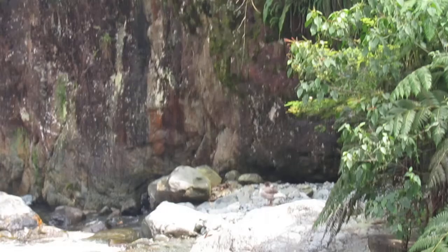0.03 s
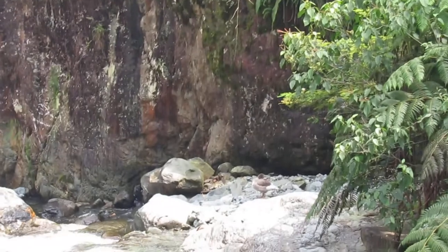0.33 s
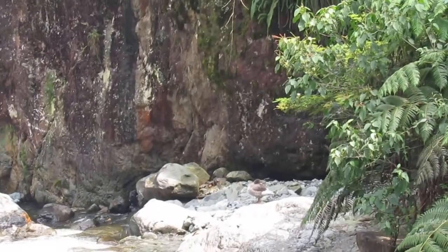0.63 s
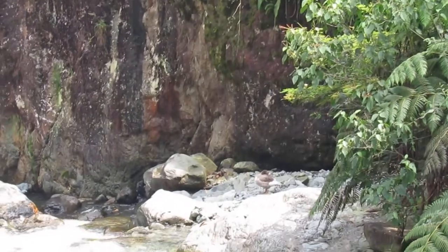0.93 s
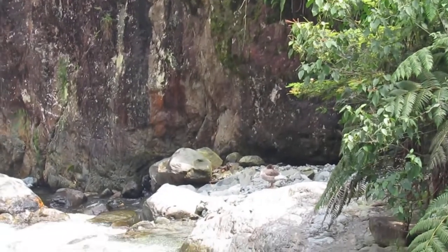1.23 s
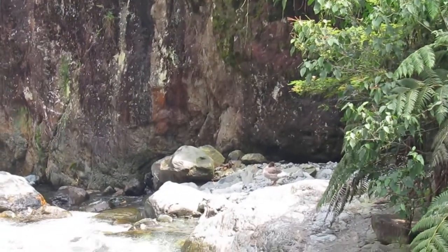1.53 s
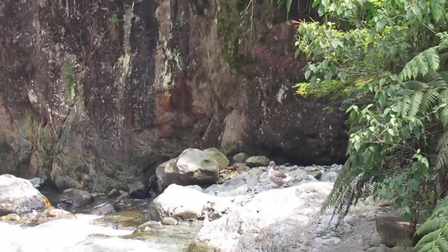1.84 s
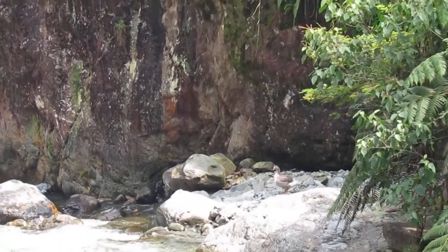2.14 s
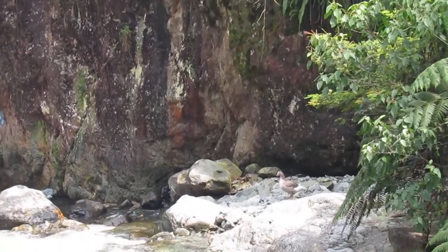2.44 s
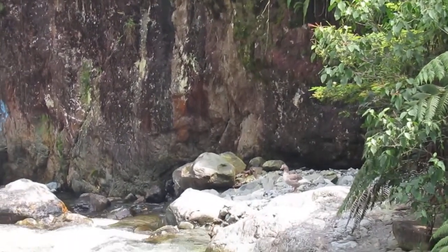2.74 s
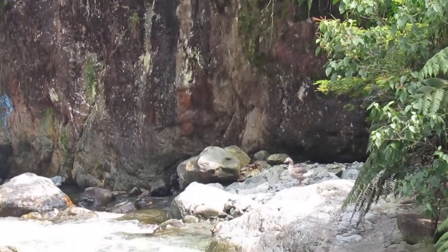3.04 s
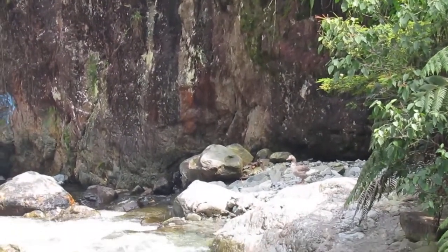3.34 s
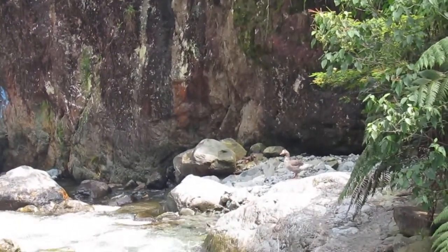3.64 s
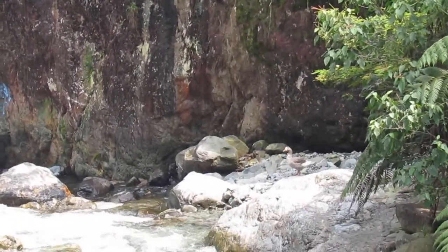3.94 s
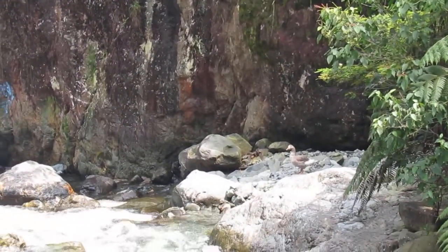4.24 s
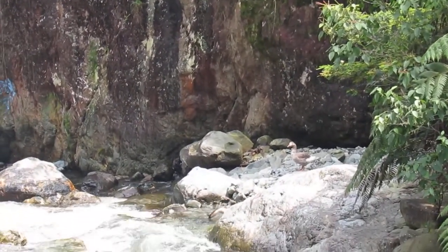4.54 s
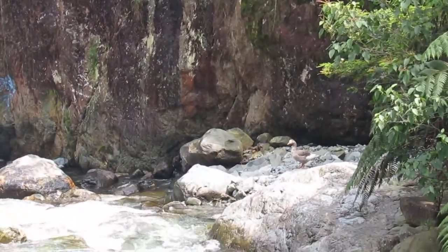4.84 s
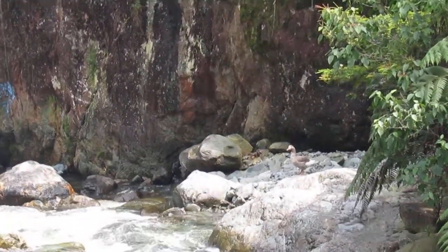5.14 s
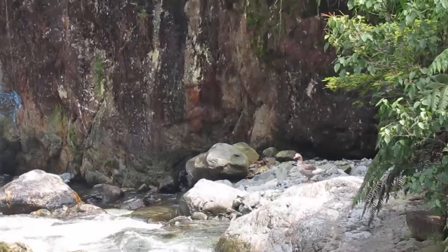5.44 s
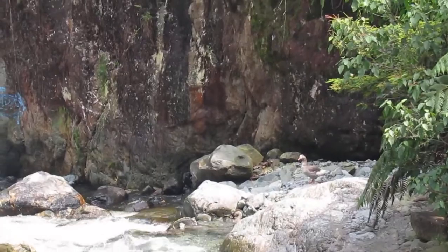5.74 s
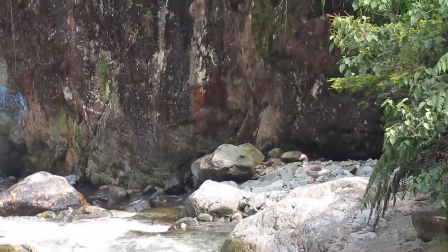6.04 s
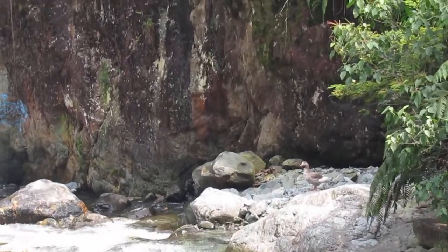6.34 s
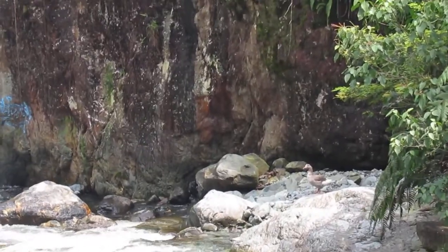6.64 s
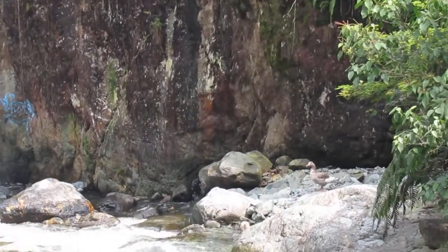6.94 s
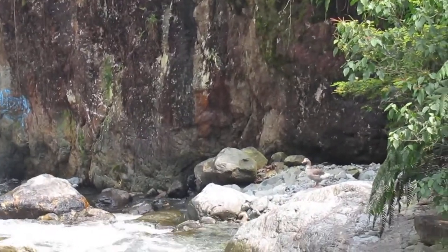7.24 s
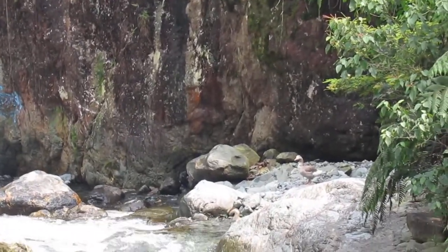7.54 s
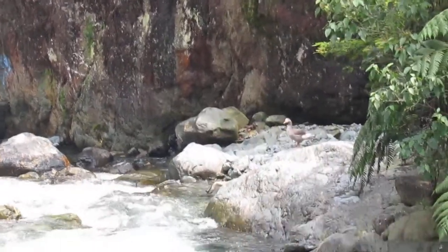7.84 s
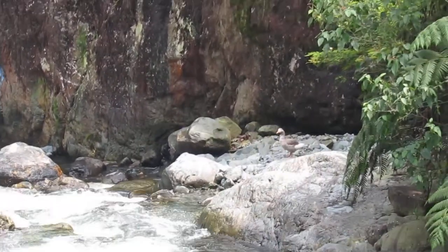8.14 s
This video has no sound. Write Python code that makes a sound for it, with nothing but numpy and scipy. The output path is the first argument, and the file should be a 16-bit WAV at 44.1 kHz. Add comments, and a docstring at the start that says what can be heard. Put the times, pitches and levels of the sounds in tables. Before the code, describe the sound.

The sound starts abruptly at about 0.2 seconds with shallow rapids rushing over boulders, a dense, bubbling, slightly hollow wash that continues throughout. Wind blows directly on the microphone, making a wide, lumpy low rumble with hard thumps through the first 2 seconds. It weakens after that, and from about 2.7 to 4.8 seconds the river is heard almost alone, with one soft bump near 3 seconds. Around 5 seconds the wind comes back strongly, hitting hardest at about 5.6 seconds. One small, sharp tick sounds near 5.4 seconds. Irregular gusts and thumps keep coming, several in quick succession from 7 seconds until the end at about 8.3 seconds. After each hard thump the river briefly drops in level and then swells back.

```python
"""Below a rock wall, beside shallow rapids: countless bubbles make a steady rush over the boulders.
Gusts buffet the two closely spaced ports of a camera microphone, nearly in opposite phase.
Each hard thump of wind makes the recorder's limiter duck the river, which then swells back.
One small tick sounds. The sound starts abruptly, and the recorder cuts a hollow into the midrange."""
import sys
import numpy as np
from scipy import signal
from scipy.fft import rfft, irfft
from scipy.io import wavfile
from scipy.ndimage import uniform_filter1d, minimum_filter1d

SR = 44100
rng = np.random.default_rng(int(sys.argv[2]) if len(sys.argv) > 2 else 0)


def dump_mix(stems):
    """Bounce the given channels to the path in sys.argv[1] as a 16-bit WAV at rate SR."""
    frames = np.atleast_2d(stems).T  # one column per channel
    limited = np.clip(frames, -1, 1)  # hard clip at full scale
    pcm = np.round(limited * 32767).astype(np.int16)
    wavfile.write(sys.argv[1], SR, pcm)


N = 365148

# spectrum of the white water at the microphone: (frequency [Hz], relative level [dB])
WATER_SPECTRUM = [(30, -40), (70, -14), (130, -4.5), (250, .5), (400, 0), (560, -3.5), (1150, -7),
                  (1700, -13.5), (2500, -20.5), (4600, -27), (6300, -27.5), (9000, -32), (12000, -36.5),
                  (15500, -46.5)]


def gain_of(db):
    """Decibels to amplitude."""
    return 10 ** (np.asarray(db) / 20)


def unit_rms(x):
    """Scales to an rms of 1."""
    return x / np.sqrt(np.mean(x ** 2) + 1e-20)


def at_hz(table, hz, column=1):
    """One column of a table, joined by straight lines over log frequency."""
    columns = np.transpose(table)
    return np.interp(np.log(hz + 1), np.log(columns[0] + 1), columns[column])


def coloured(x, spectrum):
    """Filters a sound by a spectrum table, at rms 1."""
    return unit_rms(irfft(rfft(x) * gain_of(at_hz(spectrum, np.fft.rfftfreq(N, 1 / SR))), N))


def wander(rate_hz):
    """A smooth random curve of rms 1 that moves up to about the given rate."""
    hz = np.fft.rfftfreq(N, 1 / SR)
    return unit_rms(irfft(rfft(rng.standard_normal(N)) * np.exp(-(hz / rate_hz) ** 2), N))


def patches(shape, frames, bins):
    """Random blobs over time and frequency, at rms 1."""
    smooth_in_time = uniform_filter1d(rng.standard_normal(shape), frames, axis=0)
    return unit_rms(uniform_filter1d(smooth_in_time, bins, axis=1))


def white_water(surge_db=-0.4, splash_db=0.54, flicker_db=-0.54, frame=1024, hop=256):
    """Countless bubbles merge into a rush, with broad surges and brief splashes in it."""
    # the river at the two ports, which hear the same low roar but different spray:
    # (frequency [Hz], coherence [0-1], left phase lead [rad], left minus right [dB])
    ports = [(350, 1, 0.14, -2.5), (550, 0.97, 0.29, -1), (1100, 0.96, 0.14, 0.6), (2000, 0.95, 0.075, 0.8),
             (3000, 0.99, 0.02, 0.0), (4500, 0.88, 0.17, -0.4), (6500, 0.73, 0.38, -0.6),
             (9000, 0.43, 0.5, -0.8), (12000, 0.3, 0.98, -1.9), (15000, 0.28, 2.56, -2.0)]
    hz = np.fft.rfftfreq(frame, 1 / SR)
    coherence, lead, balance_db = (at_hz(ports, hz, column) for column in (1, 2, 3))
    shape = (N // hop + 5, len(hz))
    left, unrelated = rng.standard_normal((2, *shape)) + 1j * rng.standard_normal((2, *shape))
    right = (coherence * left + np.sqrt(1 - coherence ** 2) * unrelated) * np.exp(-1j * lead)
    lean = gain_of(balance_db / 2)
    pair = np.array([left * lean, right / lean])
    mid_power = np.mean(abs(pair.mean(0)) ** 2, axis=0)
    pair /= np.sqrt(uniform_filter1d(mid_power, size=9))
    churn_db = surge_db * patches(shape, frames=22, bins=60)
    churn_db += splash_db * patches(shape, frames=6, bins=22)
    churn_db += flicker_db * patches((shape[0], 1), frames=4, bins=1)
    spectra = pair * gain_of(at_hz(WATER_SPECTRUM, hz) + churn_db)
    water = signal.istft(spectra.transpose(0, 2, 1), nperseg=frame, noverlap=frame - hop)[1][:, :N]
    return water / np.std(water.mean(0))


def bubbles(per_s=1500, spread_db=3.0, cycles=7, rise=0.0756, low_hz=450, high_hz=9000, pitches=36):
    """Bubbles nearer the microphone ring for a few cycles, rising in pitch as they reach the surface."""
    out = np.zeros((2, N))
    for hz in np.geomspace(low_hz, high_hz, pitches):
        age = np.arange(0, 5, hz / (cycles * SR))  # in decay times
        envelope = np.exp(-age) * (1 - np.exp(-10 * age))
        ring = envelope * np.sin(2 * np.pi * cycles * age * (1 + rise * age / 2))
        when, faintness, side = rng.random((int(per_s / pitches * N / SR), 3)).T
        strength = gain_of(-spread_db * np.log(np.maximum(faintness, .01))) * hz
        births = np.zeros((2, N))
        births[:, (when * N).astype(int)] = strength * (1 + np.outer([1, -1], side - .5))
        out += signal.oaconvolve(births, ring[None], axes=1)[:, :N]
    return coloured(out, WATER_SPECTRUM)


def wind_force_db():
    """Each gust swells and dies as a bell curve; its power adds to that of the breeze."""
    # the breeze drops to a lull and picks up again: (time [s], level [dB])
    breeze = [(.25, -20.5), (1.15, -12), (1.4, -23), (2.1, -24), (2.6, -18), (2.85, -27.5), (3.5, -28),
              (3.85, -23.5), (4.3, -28), (4.7, -19), (5.05, -8.5), (5.75, -10), (6.15, -14.5), (6.7, -19),
              (7.3, -10), (7.7, -14), (8.27, -11.5)]
    # separate gusts at the microphone: (peak time [s], length [s], level [dB])
    gusts = [(0.29, 0.051, -4.5), (0.416, 0.085, -6.5), (0.657, 0.11, -17), (1.305, 0.08, -14.5),
             (1.526, .07, -9), (1.735, 0.042, -9), (1.84, 0.06, -5.5), (1.95, .04, -9), (2.255, 0.069, -14),
             (2.475, .1, -13), (3.04, 0.04, -16), (4.875, 0.03, -20.5), (5.56, 0.086, -4),
             (5.93, 0.098, -9), (6.5, 0.11, -10), (6.98, 0.048, -17)]
    t = np.arange(N) / SR
    breeze_power = gain_of(np.interp(t, *np.transpose(breeze))) ** 2
    gust_power = sum((gain_of(db) * np.exp(-2 * ((t - s) / length) ** 2)) ** 2 for s, length, db in gusts)
    return 10 * np.log10(breeze_power + gust_power)


def wind_rumble(lumps_db=2.5, lumps_hz=28, knee_hz=260, brighten=0.87, bright_from_db=-10,
                bright_span_db=4, common_db=-15, left_db=0.6, ceiling=0.75):
    """Turbulence hits the microphone in lumps; the stronger it blows, the brighter the rumble."""
    # wind rumble at the ports: (frequency [Hz], relative level [dB])
    rumble_spectrum = [(15, -22), (35, -9.5), (70, 1), (110, 1.5), (170, -2.5), (250, -12), (330, -10),
                       (450, -31), (600, -32), (1000, -55), (2500, -90)]
    lumps = unit_rms(gain_of(lumps_db * wander(lumps_hz)))
    force_db = wind_force_db() + 20 * np.log10(lumps)
    eddies = coloured(rng.standard_normal((2, N)), rumble_spectrum)
    large = signal.sosfiltfilt(signal.butter(2, knee_hz, fs=SR, output="sos"), eddies)
    small = (eddies - large) * gain_of(brighten * np.minimum(force_db - bright_from_db, bright_span_db))
    opposed, common = (large + small) * gain_of(force_db)
    flattened = ceiling * np.tanh(opposed / ceiling)
    port_gains = [gain_of(left_db), -gain_of(-left_db)]  # the left port takes a little more wind
    return np.outer(port_gains, flattened) + gain_of(common_db) * common


def buffeted(turbulence, right_db=-2.5):
    """Each big eddy displaces the turbulence: one pressure swing pushes one port and pulls the other."""
    # eddies that thump the microphone: (time [s], peak at the left port [dB], pitch [Hz])
    thumps = [(.261, 5, 110), (0.433, 3, 110), (.71, .5, 130), (.811, 5.5, 179), (1.123, 4, 110),
              (1.51, 2, 140), (1.836, 3.5, 160), (3.054, -8, 140), (4.876, -1, 120), (5.028, 3.2, 130),
              (5.121, 4, 140), (5.241, 4.5, 120), (5.541, 7.5, 90), (5.626, 8, 211), (5.933, 5, 170),
              (6.244, 4.5, 170), (6.588, 3.5, 220), (6.984, 2.5, 160), (7.176, 3.5, 100), (7.29, 1, 200),
              (7.464, 6.4, 200), (7.802, 6, 100), (8.02, 5.3, 150), (8.216, 6, 179)]
    out, t = turbulence.copy(), np.arange(N) / SR
    for s, db, hz in thumps:
        near = abs(t - s) < 2 / hz
        phase = np.pi * hz * (t[near] - s)
        swing = gain_of(db) * (1 - 2 * phase ** 2) * np.exp(-phase ** 2)
        out[:, near] *= 1 - np.exp(-(phase / 2) ** 2)
        out[:, near] += np.outer([1, -gain_of(right_db)], swing)
    return out


def tick(at_s=5.4233, peak_db=-3, decay_s=0.00059, left_db=-5):
    """A sudden step that dies at once, stronger on the right."""
    age = np.arange(N) / SR - at_s
    step = gain_of(peak_db) * (age >= 0) * np.exp(-abs(age) / decay_s)
    return np.outer([gain_of(left_db), -1], step)


def limiter(x, threshold_db=-2, attack_s=0.0078, recovery_per_s=.41):
    """A high peak pulls the gain down, which then creeps back: the river ducks after each hard thump."""
    peak = abs(x).max(0)
    allowed = gain_of(threshold_db) / np.maximum(peak, gain_of(threshold_db))
    climb = recovery_per_s * np.arange(N) / SR
    duck = 1 - (np.minimum.accumulate(allowed - climb) + climb)
    lag = np.exp(-1 / (attack_s * SR))
    eased_duck = signal.lfilter([1 - lag], [1, -lag], duck)
    gain = np.minimum(1 - eased_duck, 1 / np.maximum(peak, 1))  # overshoot is caught at full scale
    return x * uniform_filter1d(minimum_filter1d(gain, size=257), size=257)


def scene(water_db=-16.5, bubbles_db=-30.0):
    """The steady river, wind right on the microphone and one tick."""
    river = gain_of(water_db) * white_water() + gain_of(bubbles_db) * bubbles()
    return river + buffeted(wind_rumble()) + tick()


def record(dry, notch_hz=690, notch_width_hz=390, notch_db=-20, start_s=.2425, top_hz=15800):
    """The recorder notches the midrange, starts abruptly, limits the peaks and cuts the top treble."""
    notched = signal.lfilter(*signal.iirnotch(notch_hz, notch_hz / notch_width_hz, fs=SR), dry)
    hollow = notched + gain_of(notch_db) * (dry - notched)
    rolling = np.arange(N) >= start_s * SR
    low_pass = signal.firwin(511, top_hz, window=("kaiser", 9), fs=SR)
    return signal.oaconvolve(limiter(hollow * rolling), low_pass[None], "same")


dry = scene()
out = record(dry)
dump_mix(out)
```